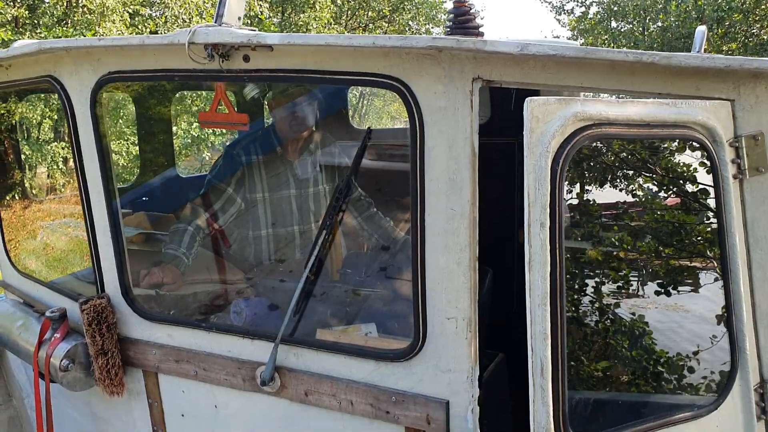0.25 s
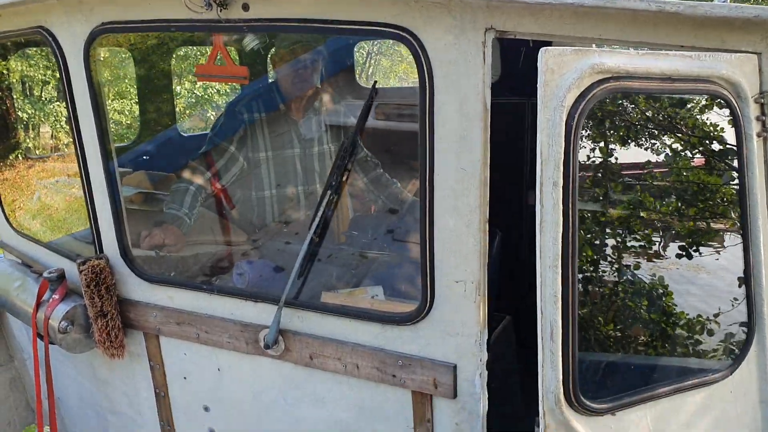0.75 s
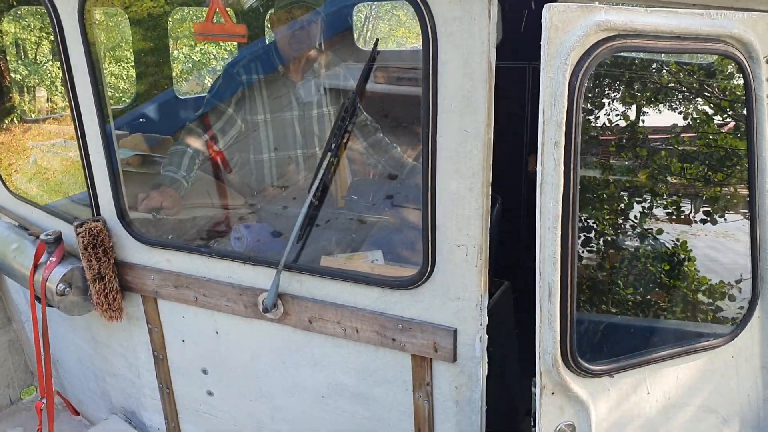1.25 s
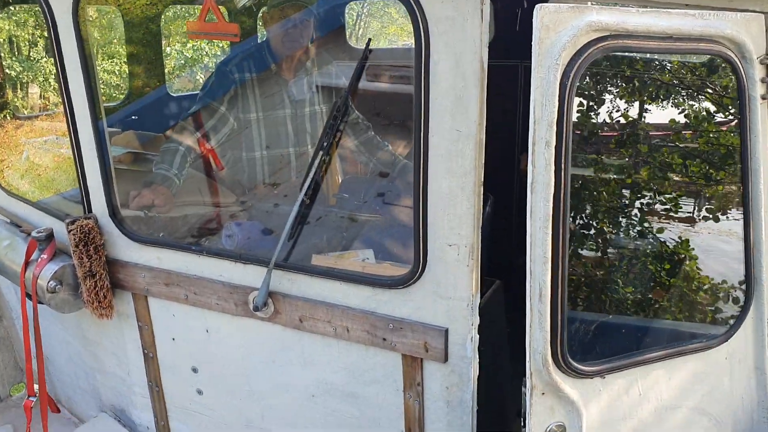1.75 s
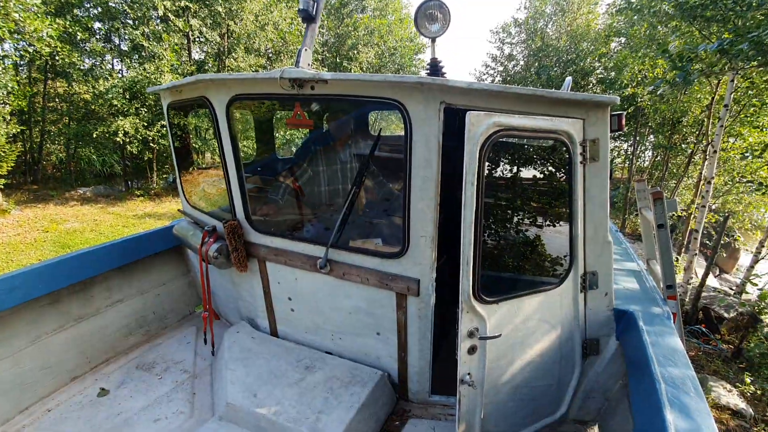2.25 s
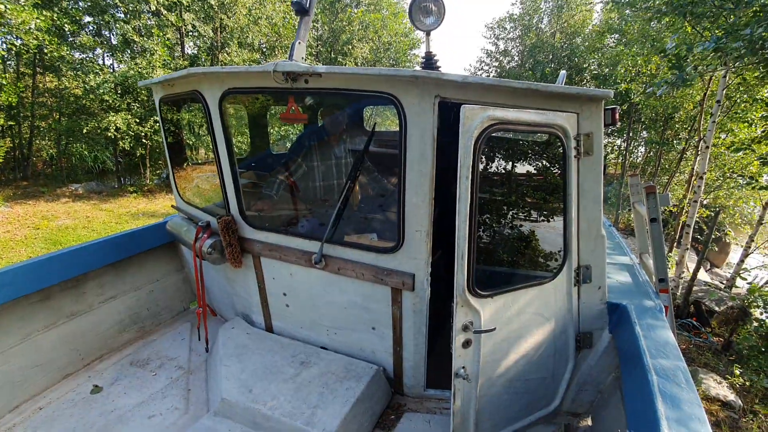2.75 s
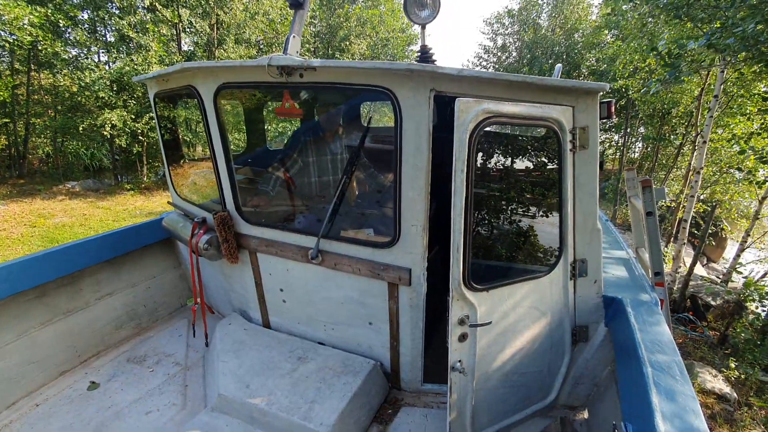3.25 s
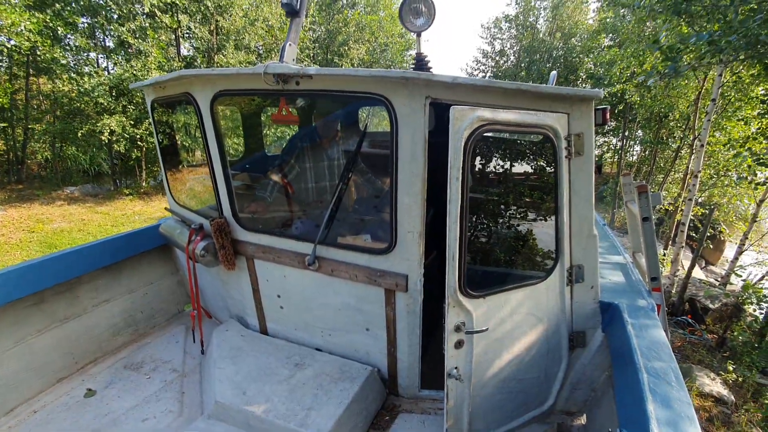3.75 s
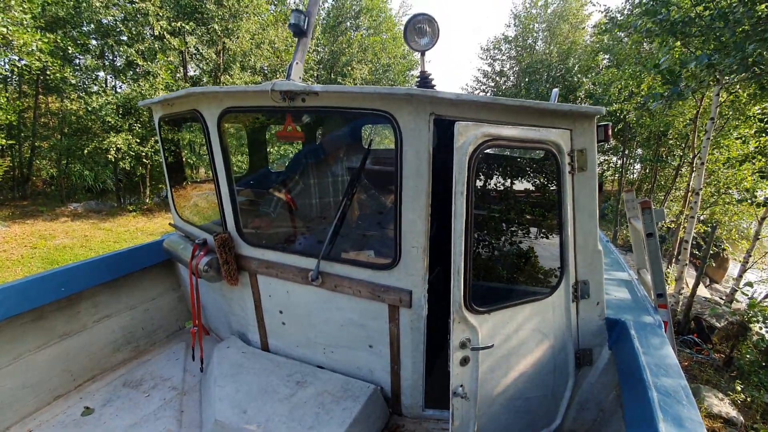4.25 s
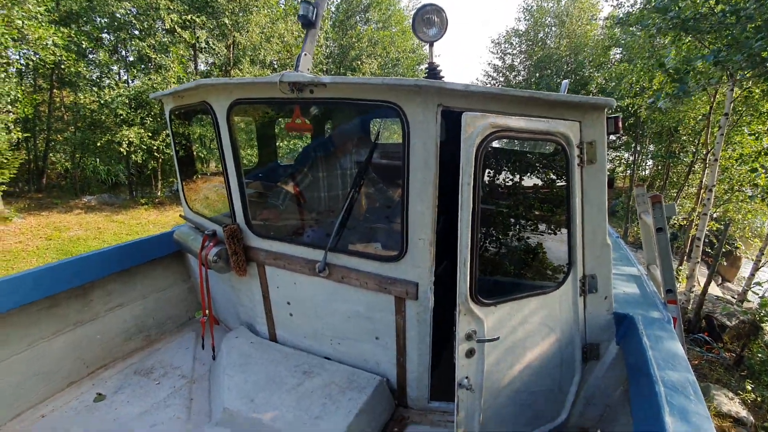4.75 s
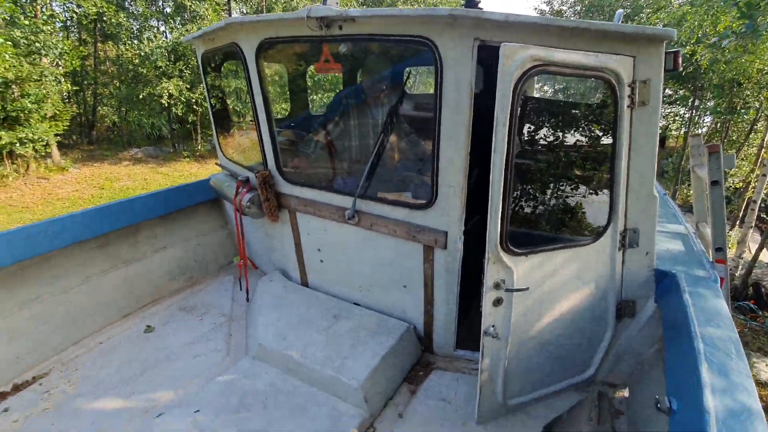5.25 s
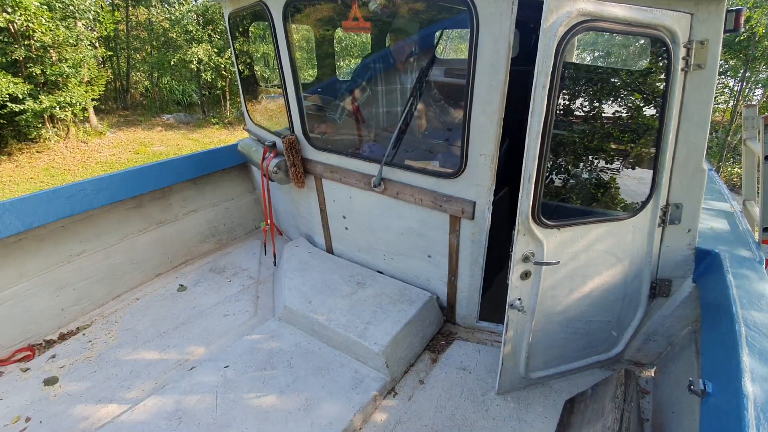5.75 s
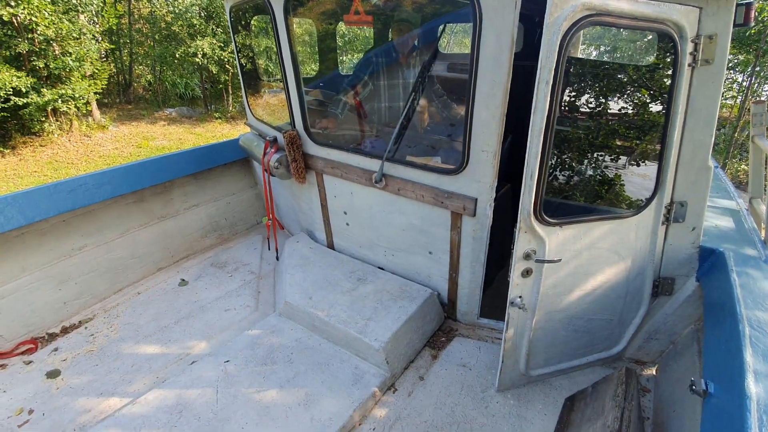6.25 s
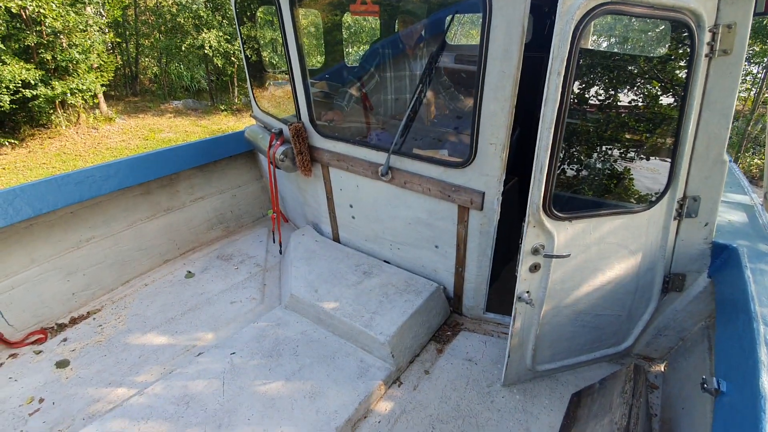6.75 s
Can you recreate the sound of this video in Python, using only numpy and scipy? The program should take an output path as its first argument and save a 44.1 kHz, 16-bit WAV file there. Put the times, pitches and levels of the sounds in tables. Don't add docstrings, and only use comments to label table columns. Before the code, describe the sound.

Outdoors, a large boat engine is cranked without catching: a rhythmic grinding growl, about two surges a second, with deep thuds, metal chatter and airy hiss.

```python
import sys
import numpy as np
from scipy import signal
from scipy.fft import rfft, irfft, next_fast_len
from scipy.io import wavfile
from scipy.ndimage import uniform_filter1d, map_coordinates

SR = 44100
rng = np.random.default_rng(int(sys.argv[2]) if len(sys.argv) > 2 else 0)


def generate_wav(signal):
    frames = np.transpose(np.atleast_2d(signal))
    scaled = np.clip(frames, -1, 1) * 32767
    pcm = np.round(scaled).astype(np.int16)
    wavfile.write(sys.argv[1], SR, pcm)


def elevation(decibels):
    levels = np.asarray(decibels, float)
    return 10 ** (levels / 20)


N = 307818

# t/s, drive level/dB, treble level/dB
DRIVE = [(0, 0, -3), (.14, -6, 2), (.2, -2.5, -1), (.3, -5.5, -0.5), (.6, -2.5, 0.5), (.9, 0.5, 0.5),
         (1.3, -1.5, 2.5), (1.8, 0, 1), (2.3, 0.5, 0.5), (2.8, 0, 0), (3.2, 1, -0.5), (3.7, -1, 0.5),
         (4.2, -0.5, -1), (4.6, -0.5, -0.5), (5.5, 0.5, -1.5), (6.1, 0.5, -2.5), (6.6, -1, -1),
         (6.98, -1.5, -0.5)]


def starter(turns):
    return growl(turns) + rattle(turns) + hiss(turns) + whine()


# f/Hz, width f/Hz, level/dB
CASING = [(155.9, 23.8, -1), (221, 21.4, -3), (257.5, 31.8, -4.5), (312, 46.8, -3.5), (380, 80.3, -6),
          (479, 124, -8), (603, 284, -14.5)]


def growl(turns):
    casing_db = np.transpose(STROKES)[2]
    level_db = loaded(-27, "growl", 0.84 * casing_db)
    blows = .25 * knocks(turns, scatter_db=3, late_s=.003)
    scrape = gated(turns, depth_db=1.2, lead=.1) * elevation(1.3 * wobble(30))
    shaken = unit(filtered(blows + scrape, body(CASING, low_hz=120, high_hz=700)))
    mesh = np.sin(2 * np.pi * 9 * turns + .7 * wobble(20)) * elevation(4 * wobble(8))
    return elevation(level_db + 0.5) * unit(shaken + .36 * mesh)


# f/Hz, width f/Hz, level/dB
GEAR = [(826, 226, -5), (974, 107, 0.5), (1085, 84, -2), (1283, 208, -8)]


def rattle(turns):
    gear_db = np.transpose(STROKES)[1]
    level_db = loaded(-42.5, "rattle", 1.22 * gear_db) + curves(DRIVE)[1]
    load = np.clip((level_db - np.median(level_db)) / 8, 0, 1)
    teeth = gated(turns, depth_db=.8 + 3.5 * load, lead=.3) * elevation(1.2 * wobble(45))
    ringing = unit(filtered(teeth, body(GEAR, low_hz=650, high_hz=1600)))
    return elevation(level_db) * ringing * elevation(-1.2 * load)


# f/Hz, level/dB
AIR = [(820, -88), (1400, -11), (1720, -10.5), (2250, -7), (2920, -12), (3800, -13.5), (4870, -19),
       (5720, -21), (7170, -28.5), (8000, -34), (10400, -42), (17600, -120)]


def hiss(turns):
    air_db = np.transpose(STROKES)[3]
    level_db = loaded(-47, "hiss", 0.61 * air_db) + curves(DRIVE)[1]
    gusts_db = .5 * np.cos(2 * np.pi * turns) + .6 * wobble(14) + 1.1 * wobble(35)
    air = shaped(AIR) * elevation(gusts_db)
    return elevation(level_db) * unit(air + 0.5 * flecks(count=3000, cycles=10))


def flecks(count, cycles):
    luck = rng.random((count, 3))
    hz = 1600 * 4.4 ** luck[:, :1]
    t = np.arange(300) / SR
    size = elevation(along(AIR, hz) - 3.2 * np.log(luck[:, 1:2] + .015)) * np.sqrt(hz)
    fade = np.exp(-t * hz / cycles) * (1 - np.exp(-t / 0.00046))
    tones = size * np.sin(2 * np.pi * hz * t) * fade
    at = (luck[:, 2:] * N).astype(int) + np.arange(len(t))
    return unit(np.bincount(at.ravel(), tones.ravel(), minlength=N)[:N])


# t/s, f/Hz, level/dB
WHINE = [
    (0, 1350, -82),
    (5.4, 1460, -72),
    (5.8, 1343, -49),
    (6.1, 1363, -58),
    (6.4, 1400, -50),
    (6.98, 1396, -50),
]


def whine():
    whine_hz, whine_db = curves(WHINE)
    tone = np.sin(2 * np.pi * np.cumsum(whine_hz + 14 * wobble(40)) / SR)
    return tone * elevation(whine_db - .5 + 3.5 * wobble(22))


# t/s, gear surge level/dB, casing surge level/dB, air surge level/dB, belt slip level/dB
STROKES = [(.37, 7.5, 6, 8.5, 7), (1.04, 3.5, 4.5, 6, 8), (1.5, 3, 3, 0.5, 3), (1.99, 4, 3.5, 3, 4),
           (2.46, 5.5, 5, 4.5, 6), (2.93, 2, 1.5, 2.5, 4), (3.409, 5, 5, 6, 5), (3.87, 4, 3.5, 2.5, 3),
           (4.33, 7, 4, 6.5, 4), (4.81, 6.5, 5.5, 3.5, 3), (5.26, 6, 5, 6, 6.5), (5.78, 4.5, 3.5, 2.5, 3),
           (6.21, 8, 5.5, 6, 6), (6.71, 5, 6, 2.5, 6)]
# delay t/s, rise t/s, fall t/s
SURGES = dict(growl=(.02, .065, .085), rattle=(.01, .065, .06), hiss=(-.02, .035, .17),
          slip=(.07, .04, .11))


def loaded(rest_db, layer, size_db):
    delay_s, rise_s, fall_s = SURGES[layer]
    at_s = np.transpose(STROKES)[0]
    lull_s = .035
    hush_db = surge(at_s - .115, 2.2, lull_s, lull_s / 2)
    return rest_db + curves(DRIVE)[0] + surge(at_s + delay_s, size_db, rise_s, fall_s) - hush_db


# t/s, slow-down f/Hz
SHAFT = [(.33, 3), (.53, 4), (.9, 4), (1.49, 5), (1.98, 5), (2.42, 2), (2.9, 5), (3.38, 4.5), (3.86, 4.5),
         (4.33, 4), (4.81, 4.5), (5.26, 5), (5.76, 5), (6.22, 5), (6.5, 3), (6.7, 5)]


def shaft_turns(fall_s, rise_s):
    free_hz = 29
    t = np.arange(0, N, 64) / SR
    s, drop_hz = np.transpose(SHAFT)
    since = t[:, None] - s
    dips = drop_hz * np.exp(-np.abs(since) / np.where(since < 0, fall_s, rise_s))
    speed_hz = np.interp(np.arange(N) / SR, t, free_hz - dips.sum(axis=1))
    return np.cumsum(speed_hz + .5 * wobble(8)) / SR


# f/Hz, width f/Hz, level/dB
HULL = [(72.2, 14.6, -0.5), (102.2, 23.4, -0.5)]
# t/s, drone surge level/dB, thump surge level/dB, length t/s
HEAVES = [(0.412, 7, 3, 0.083), (1.092, 15, 1, 0.025), (1.594, 10, -1, 0.053), (2.063, 6, 8, 0.058),
          (2.52, 12, 3, 0.029), (2.996, -1, 18, 0.033), (3.46, 17, 15, 0.044), (3.966, 20, 6, 0.1),
          (4.413, 9, 8, 0.047), (4.872, 5.5, 12, 0.086), (5.338, 1, 22.5, 0.039), (5.854, 10, 11, 0.072),
          (6.317, 17, 5.5, 0.041), (6.8, 9, 15, 0.099)]


def hull(turns):
    s, drone_surge_db, thump_surge_db, length_s = np.transpose(HEAVES)
    drone_db = -28 + np.array([1.1, -1.2]) @ curves(DRIVE) + 2 * wobble(9)
    drone_db += surge(s, drone_surge_db, length_s, length_s)
    thump_db = -27.5 + curves(DRIVE)[0] + 2.3 * wobble(16)
    thump_db += surge(s + 0.0042, thump_surge_db, length_s, length_s)

    loose = filtered(rng.standard_normal(N), body([(55.6, 31, 0)], low_hz=37.6, high_hz=91))
    drone = np.sin(4 * np.pi * turns + .45 * wobble(12)) * np.sqrt(2) + .6 * unit(loose)

    plates = body(HULL, low_hz=63.4, high_hz=216)
    push = knocks(turns, scatter_db=2, late_s=.0012) + .5 * rng.standard_normal(N)
    thump = filtered(push, lambda f: plates(f) / (1 + (64 / (f + 1)) ** 8))

    pushes, busy = pounding()
    give_way = elevation(-11 * busy)
    return give_way * (elevation(drone_db) * unit(drone) + elevation(thump_db) * unit(thump)) + pushes


# first t/s, last t/s, hardest t/s, peak level/dB
POUNDING = [(2.045, 2.122, 2.06, -12.5), (2.488, 2.562, 2.525, -10.5), (4.371, 4.404, 4.405, -11),
            (5.025, 5.093, 5.056, -16), (2.967, 3.148, 3.007, -13.5), (3.41, 3.519, 3.45, -11.5),
            (3.829, 4.089, 4.0, -11.5), (4.842, 4.878, 4.875, -12), (4.928, 4.965, 4.93, -12.5),
            (5.253, 5.366, 5.331, -12), (5.803, 6.088, 5.88, -11), (6.299, 6.337, 6.3, -8.5),
            (6.743, 6.925, 6.82, -10)]


def pounding():
    turn_s, push_hz, push_s, fade_db = .037, 74, 0.0068, .9
    out, busy = np.zeros(N + SR), np.zeros(N)
    t = np.arange(-SR // 25, SR // 25) / SR
    swing = -np.cos(2 * np.pi * push_hz * t) * np.exp(-.5 * (t / push_s) ** 2)
    for first, last, hardest, db in POUNDING:
        for s in np.linspace(first, last, round((last - first) / turn_s) + 1):
            start = round((s + t[0]) * SR)
            out[start:][:len(t)] += swing * elevation(db - fade_db * abs(s - hardest) / turn_s)
        busy[round((first - turn_s / 2) * SR):round((last + turn_s / 2) * SR)] = 1
    return out[:N], uniform_filter1d(busy, size=1200)


# t/s, peak level/dB, bright edge level/dB
TEETH = [(0.301, -28, -20), (0.337, -26, -21), (0.378, -23.5, -11), (0.939, -24, -8), (0.986, -17.5, -23),
         (1.022, -17.5, -22), (1.059, -17.5, -14), (1.478, -27, -22), (1.56, -32, -6), (1.711, -28, -17),
         (2.408, -21.5, -11), (2.443, -22, -19), (2.484, -27, -13), (2.624, -29, -17),
         (2.874, -23.5, -10.5), (2.912, -25.5, -8), (2.952, -23, -23), (3.355, -25, -14),
         (3.389, -18.5, -26), (3.845, -36, -38), (4.289, -23.5, -12), (4.762, -25.5, -23),
         (4.999, -35, -18), (5.187, -41, -19), (5.238, -23, -19), (5.271, -24, -20), (5.75, -41, -11),
         (6.184, -30, -27), (6.22, -36, -22), (6.647, -35, -18)]


def tooth_knocks():
    gear = filtered(np.arange(N) == 0, body(GEAR, low_hz=700, high_hz=1720))[:SR // 20]
    t = np.arange(SR // 20) / SR
    blows, edges = np.zeros(N + SR), np.zeros(N + SR)
    for (s, db, edge_db), luck in zip(TEETH, rng.random((len(TEETH), 4))):
        bounce_s = np.array([0, .004 + .003 * luck[0], .011 + .004 * luck[1]])
        loss_db = np.array([2, 5 + 5 * luck[2], 4 + 6 * luck[3]])
        at = round(s * SR) + np.round(SR * bounce_s).astype(int)
        blows[at] += elevation(db - loss_db)
        fade_db = 60 * t / 0.098
        edges[at[0]:][:len(t)] += elevation(db + edge_db - fade_db) * rng.standard_normal(len(t))
    rings = signal.fftconvolve(blows, gear / np.abs(gear).max())[:N]
    return rings + elevation(10.5) * filtered(edges[:N], lambda f: elevation(along(AIR, f)))


# t/s, f/Hz, level/dB, length t/s
THUDS = [(0.097, 78, -22, 0.042), (0.385, 87.6, -20.5, 0.087), (0.531, 108, -35, 0.078),
         (0.726, 97, -22.5, 0.059), (0.819, 75.6, -24.5, 0.057), (0.864, 90.5, -37, 0.059),
         (1.115, 69.6, -11.5, 0.027), (1.205, 84, -19, 0.032), (1.396, 104.0, -20.5, 0.034),
         (1.493, 95.2, -20, 0.072), (1.534, 92.4, -24, 0.069), (1.635, 74.8, -20, 0.066),
         (1.744, 113, -35, 0.048), (1.833, 91, -30, 0.039), (2.013, 91.4, -17.5, 0.061),
         (2.245, 106.6, -32, 0.039), (2.428, 65.4, -19.5, 0.034), (2.705, 106.2, -28, 0.071),
         (2.84, 102, -32, 0.055), (3.15, 113.7, -22, 0.072), (3.356, 99.7, -30, 0.063),
         (4.314, 76, -18, 0.0506), (4.55, 105.7, -25, 0.051), (4.624, 110, -22, 0.054),
         (4.797, 83.5, -34, 0.07), (5.14, 99, -28, 0.074), (5.545, 114.6, -24, 0.04),
         (5.751, 99.7, -25.5, 0.07), (6.211, 83, -22, 0.044), (6.477, 112, -26, 0.066),
         (6.58, 105.4, -26, 0.065), (6.672, 96, -15, 0.03)]
# t/s, f/Hz, level/dB, length t/s
RINGS = [(0.397, 171.7, -27, 0.043), (0.677, 425.0, -32.5, 0.064), (0.995, 229, -25, 0.087),
         (1.01, 452, -29.5, 0.049), (1.078, 389.7, -27, 0.072), (1.089, 168, -18.5, 0.026),
         (1.119, 316, -21, 0.028), (1.931, 216.2, -23.5, 0.087), (2.047, 162.3, -25.5, 0.071),
         (2.207, 243.4, -25.5, 0.09), (2.237, 230.5, -24.5, 0.083), (2.353, 394, -28.5, 0.064),
         (2.436, 419.5, -29, 0.034), (2.443, 216, -20, 0.037), (2.473, 318.3, -21.5, 0.079),
         (2.578, 438, -28, 0.034), (2.903, 477, -30, 0.038), (2.941, 253.3, -19, 0.048),
         (2.986, 313, -24.5, 0.062), (3.39, 219.6, -20.5, 0.041), (3.457, 464, -29.5, 0.042),
         (3.461, 159, -23, 0.079), (3.461, 357.5, -25, 0.048), (3.682, 237.4, -19.5, 0.045),
         (3.805, 231.7, -24, 0.062), (3.843, 421.0, -32, 0.053), (3.929, 152.5, -21.5, 0.043),
         (3.985, 312.0, -28, 0.064), (4.381, 171.2, -19.5, 0.037), (4.449, 275, -20, 0.049),
         (4.804, 228.5, -24, 0.087), (4.845, 243, -23.5, 0.034), (4.849, 167.7, -19, 0.037),
         (5.186, 223.7, -19.5, 0.057), (5.279, 217.0, -25, 0.035), (5.328, 162.5, -22, 0.042),
         (5.421, 307.6, -27, 0.099), (5.493, 257.6, -23.5, 0.057), (5.541, 152, -29, 0.06),
         (5.582, 234.7, -28.5, 0.072), (5.803, 160.6, -24, 0.059), (6.162, 213.7, -22, 0.07),
         (6.233, 229, -26.5, 0.084), (6.278, 154.5, -22, 0.057), (6.424, 422, -28.5, 0.034),
         (6.578, 237.6, -25, 0.078), (6.649, 305, -24.5, 0.032), (6.675, 366.5, -30, 0.039),
         (6.765, 166, -26, 0.036), (6.959, 236.5, -23.5, 0.034)]
# t/s, f/Hz, level/dB, length t/s
TICKS = [(0.419, 3580.0, -48, 0.012), (0.485, 3460.0, -50, 0.027), (0.697, 2550, -47, 0.01),
         (0.951, 2560, -49, 0.028), (0.954, 1850.0, -42, 0.026), (1.03, 3900.0, -53, 0.015),
         (1.057, 2290.0, -48, 0.019), (1.06, 3100, -48, 0.043), (1.07, 3860.0, -49, 0.017),
         (1.075, 6770.0, -55, 0.019), (1.099, 5920.0, -62, 0.017), (1.152, 3250.0, -44, 0.013),
         (1.491, 5670.0, -57, 0.022), (1.533, 2880.0, -46, 0.017), (1.76, 1920.0, -50, 0.012),
         (1.938, 5400, -63, 0.014), (1.978, 5460.0, -62, 0.025), (2.448, 2690.0, -51, 0.012),
         (2.562, 2310.0, -50, 0.019), (2.594, 6270.0, -67, 0.014), (2.918, 2670.0, -50, 0.017),
         (2.985, 6190.0, -65, 0.013), (2.988, 4560.0, -59, 0.013), (3.319, 1920.0, -43, 0.011),
         (3.397, 6860.0, -58, 0.011), (3.427, 2230.0, -47, 0.016), (3.472, 6250.0, -64, 0.011),
         (3.762, 2160, -46, 0.0097), (3.854, 4270.0, -49, 0.014), (3.929, 1850.0, -46, 0.013),
         (4.078, 3480.0, -54, 0.02), (4.187, 2230.0, -47, 0.016), (4.297, 2280, -47, 0.019),
         (4.354, 4110.0, -52, 0.017), (4.372, 3170.0, -56, 0.013), (4.378, 6730.0, -67, 0.013),
         (4.431, 3880.0, -57, 0.011), (4.484, 4360.0, -59, 0.02), (4.803, 4400, -54, 0.019),
         (4.834, 2210.0, -51, 0.016), (4.972, 4480.0, -59, 0.017), (5.247, 2620, -46, 0.023),
         (5.347, 3270.0, -47, 0.013), (5.746, 4200, -52, 0.012), (5.749, 5300, -52, 0.0088),
         (6.156, 2420, -48, 0.012), (6.299, 2380, -48, 0.011), (6.343, 3320, -53, 0.037),
         (6.517, 3660, -52, 0.019), (6.741, 2240, -48, 0.023)]


def loose_metal():
    thuds = bursts(THUDS, -2.0, 0.59, unsteady=0.031)
    rings = bursts(RINGS, -2.2, 0.89, unsteady=0.024)
    ticks = bursts(TICKS, 1, .5, unsteady=.015, grain=.9)
    return thuds + rings + ticks


def panel_hum():
    level_db = -33 + curves(DRIVE)[0] + 1.9 * wobble(5)
    return elevation(level_db) * np.sin(2 * np.pi * np.cumsum(220.5 + 4 * wobble(15)) / SR)


# f/Hz, level/dB
RUB = [(4590, -35), (7800, -5), (8770, 1.5), (10000, 5), (12000, -3.5), (15600, -31), (22000, -120)]


def belt():
    slip_db = np.transpose(STROKES)[4]
    level_db = loaded(-60.5, "slip", 0.74 * slip_db) + 1.4 * curves(DRIVE)[1]
    return elevation(level_db) * unit(shaped(RUB) * elevation(0.88 * wobble(25) + 0.86 * wobble(12)))


# t/s, f/Hz, level/dB, length t/s
SQUEAKS = [(0.453, 10300.0, -68, 0.081), (0.453, 11700.0, -71, 0.073), (0.456, 11000.0, -68, 0.081),
           (1.07, 10700, -61, 0.051), (1.094, 10100, -58, 0.05), (1.102, 11300.0, -69, 0.062),
           (1.598, 9770.0, -66, 0.043), (1.614, 11600.0, -75, 0.07), (1.682, 10200.0, -70, 0.047),
           (1.83, 10200.0, -75, 0.066), (2.045, 9690.0, -77, 0.055), (2.065, 8890.0, -78, 0.043),
           (2.088, 10400.0, -70, 0.096), (2.151, 10900.0, -71, 0.036), (2.161, 10200, -64, 0.07),
           (2.537, 10400.0, -68, 0.088), (2.537, 10700.0, -71, 0.051), (2.57, 9950.0, -71, 0.118),
           (2.699, 9980.0, -68, 0.055), (2.982, 10100, -62, 0.058), (3.001, 11400.0, -73, 0.066),
           (3.122, 10100.0, -70, 0.092), (3.448, 10300, -68, 0.04), (3.483, 11500.0, -78, 0.073),
           (3.513, 10600.0, -66, 0.066), (3.633, 10100.0, -82, 0.088), (3.908, 10100, -67, 0.062),
           (3.994, 10200.0, -66, 0.047), (4.378, 9980.0, -73, 0.088), (4.436, 10200.0, -71, 0.114),
           (4.436, 10800.0, -72, 0.062), (4.879, 9940.0, -71, 0.051), (4.933, 11000.0, -75, 0.047),
           (4.937, 10800.0, -75, 0.062), (5.358, 10700.0, -71, 0.043), (5.412, 10200.0, -69, 0.085),
           (5.461, 10200.0, -72, 0.085), (5.758, 9960.0, -70, 0.118), (5.837, 9930.0, -69, 0.073),
           (5.962, 9940.0, -62, 0.047), (6.278, 9970.0, -71, 0.081), (6.303, 9440.0, -72, 0.04),
           (6.362, 10100.0, -70, 0.062), (6.407, 9450.0, -72, 0.04), (6.744, 9900, -68, 0.077),
           (6.907, 10100.0, -70, 0.058)]


def belt_squeaks():
    return bursts(SQUEAKS, 1.5, .9, unsteady=.004, grain=.5) * np.array([[1], [.9]])


# f/Hz, likeness [0-1]
ALIKE = [(40, 1), (80, 1), (160, 0.97), (330, 0.96), (700, 0.78), (1400, 0.46), (2800, 0.21), (5000, 0.026),
         (10000, 0.2)]
# f/Hz, lead [radians]
LEAD = [(40, 0), (300, -.08), (1120, .25), (1890, -.9), (2670, -.3), (3620, -.9), (6200, -.6),
        (10200, -1.1)]


def deck(x):
    opposite = np.array([[1], [-1]])
    hz, _, z = signal.stft(x, SR, nperseg=1024, noverlap=512)
    field = rng.random((2, *z.shape)) - .5
    steady = uniform_filter1d(uniform_filter1d(field, size=5, axis=1), size=4, axis=2)
    dense = uniform_filter1d(field, size=2, axis=2)
    re, im = np.where(hz[:, None] < 1100, steady, dense)
    phase = (re + 1j * im) / (np.hypot(re, im) + 1e-9)
    turn = np.arccos(np.clip(along(ALIKE, hz), 0, 1))[:, None] / 2
    side = signal.istft(z * np.sin(turn) * phase, SR, nperseg=1024, noverlap=512)[1][:N] * 1.46

    def direct(f):
        lag = 1 + 1j * np.tan(along(LEAD, f) / 2) * opposite
        return lag * np.sqrt((1 + np.clip(along(ALIKE, f), 0, 1)) / 2)

    return filtered(x, direct) + side * opposite


# f/Hz, level/dB
LEAVES = [(2940, 0.5), (5000, 0), (7750, -4), (8740, 3), (10100, -7.5), (12500, -2.5), (14800, -1),
          (15800, -8)]


def leaves():
    pair = filtered(rng.standard_normal((2, N)), lambda hz: elevation(along(LEAVES, hz)))
    return elevation(-59.5 + 1.2 * wobble(1.16)) * unit(pair)


def knocks(turns, scatter_db, late_s):
    at = np.flatnonzero(np.diff(np.floor(turns)) > 0)
    luck = rng.standard_normal((len(at), 2))
    late = np.round(luck[:, 0] * late_s * SR).astype(int)
    blows = np.zeros(N)
    blows[np.clip(at + late, 0, N - 1)] = elevation(scatter_db * luck[:, 1])
    return unit(blows)


def gated(turns, depth_db, lead):
    return elevation(depth_db * (1 - 2 * ((turns + lead) % 1))) * rng.standard_normal(N)


def bursts(rows, gain_db, rise, unsteady, grain=0):
    out = np.zeros(N + SR)
    for s, hz, db, length_s in rows:
        half = round(1.5 * length_s * SR)
        u = np.arange(-half, half) / (length_s * SR) + (1 - rise) / 4
        shape = np.exp(-2.3 * (u / np.where(u < 0, rise, 2 - rise)) ** 2)
        bend = np.interp(u, np.linspace(u[0], u[-1], 9), rng.standard_normal(9))
        wave = np.sin(2 * np.pi * np.cumsum(hz * (1 + unsteady * bend)) / SR)
        tone = elevation(db + gain_db) * np.sqrt(2) * shape * wave
        rough = np.interp(u, u[::30], rng.standard_normal(len(u[::30])))
        tone *= np.cos(grain) + np.sin(grain) * rough * 1.2
        start = round(s * SR) - len(u) // 2
        out[max(start, 0):start + len(u)] += tone[max(-start, 0):]
    return out[:N]


def surge(at_s, size_db, rise_s, fall_s):
    t = np.arange(0, N, 128) / SR
    since = t[:, None] - at_s
    bells = size_db * np.exp(-.5 * (since / np.where(since < 0, rise_s, fall_s)) ** 2)
    return np.interp(np.arange(N) / SR, t, bells.max(axis=1))


def body(modes, low_hz, high_hz):
    def response(f):
        ring = 0
        for k, (centre, width, db) in enumerate(modes):
            mode = 1j * f * width / (centre * centre - f * f + 1j * f * width)
            ring = ring + (-1) ** k * elevation(db) * mode
        return ring * (1j * f / (low_hz + 1j * f)) ** 2 / (1 + 1j * f / high_hz) ** 2
    return response


def shaped(spectrum):
    return unit(filtered(rng.standard_normal(N), lambda hz: elevation(along(spectrum, hz))))


def filtered(x, response):
    m = next_fast_len(N + SR // 2)
    return irfft(rfft(x, m) * response(np.fft.rfftfreq(m, 1 / SR)), m)[..., :N]


def wobble(rate):
    at = np.arange(0, N + 32, 32)
    knots = rng.standard_normal(int(N * rate / SR) + 4)
    return np.interp(np.arange(N), at, map_coordinates(knots, [at * rate / SR]))


def curves(rows):
    s, *cols = np.transpose(rows)
    return [np.interp(np.arange(N) / SR, s, c) for c in cols]


def along(points, hz):
    f, v = np.transpose(points)
    return np.interp(np.log(hz + 1), np.log(f + 1), v)


def unit(x):
    return x / np.sqrt(np.mean(x ** 2) + 1e-20)


# t/s, depth level/dB, fall t/s, recovery t/s
STUMBLE = (0.2, 12, 0.014, 0.025)


def scene():
    turns = shaft_turns(fall_s=.06, rise_s=.11)
    stumble_db = surge(*STUMBLE)
    low = elevation(-stumble_db) * (hull(turns) + loose_metal() + panel_hum())
    cranking = elevation(-.4 * stumble_db) * starter(turns)
    engine = deck(low + cranking + tooth_knocks() + belt())
    return engine + belt_squeaks() + leaves()


def low_pass(x):
    return signal.sosfilt(signal.butter(12, 16220, fs=SR, output="sos"), x)


# f/Hz, level/dB
TILT = [(60, 0), (150, 1), (380, 1.0), (950, 2.5), (2380, 1.0), (9000, 1.3), (15000, 7.5)]


def record(dry):
    def ports(hz):
        return elevation(along(TILT, hz) * np.array([[.5], [-.5]])) * (hz < 15770)
    return low_pass(filtered(dry, ports))


dry = scene()
out = record(dry)
generate_wav(out)
```